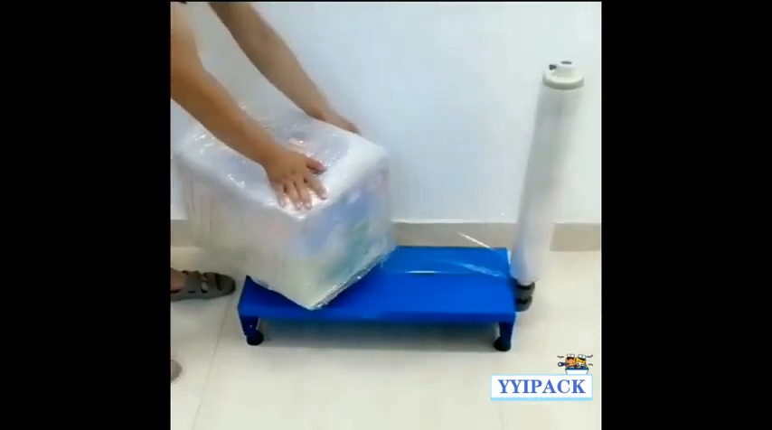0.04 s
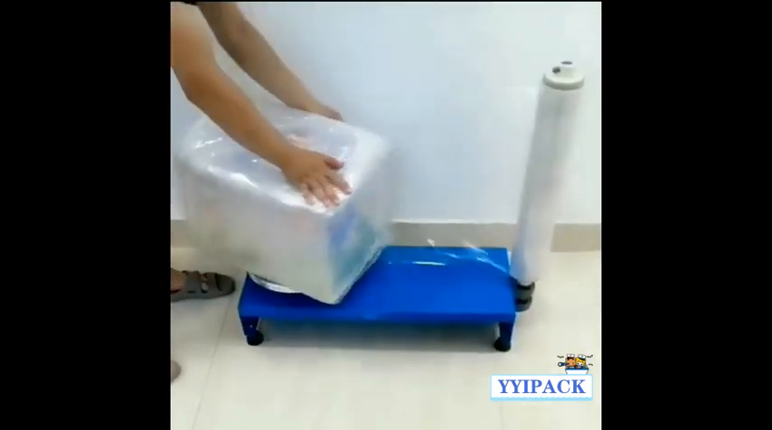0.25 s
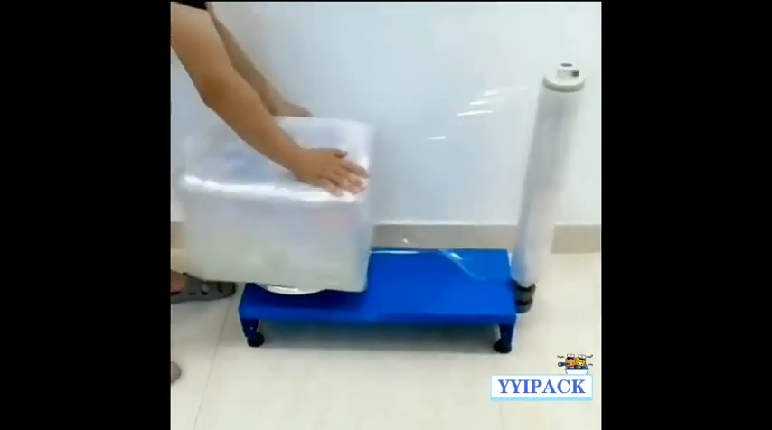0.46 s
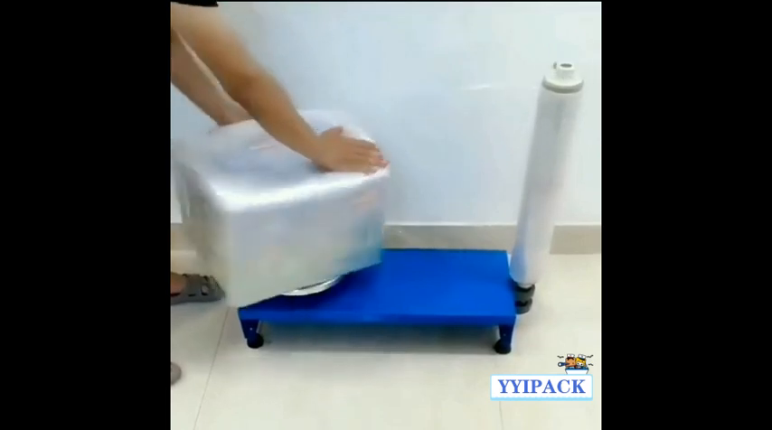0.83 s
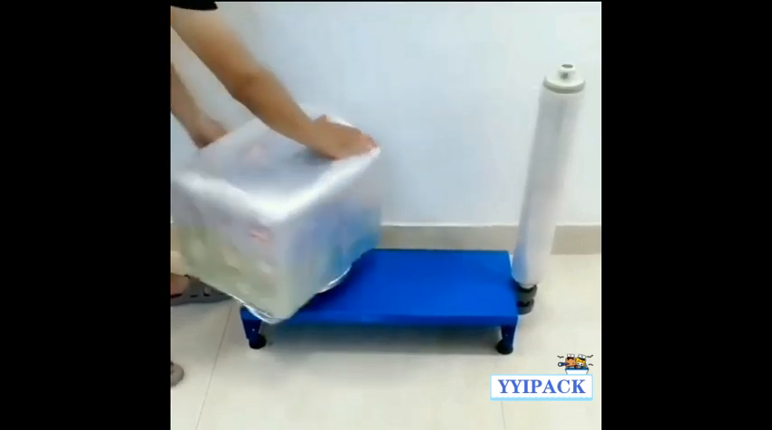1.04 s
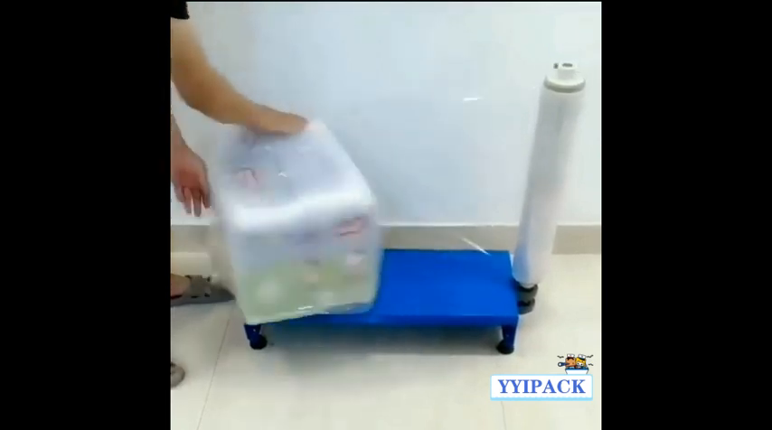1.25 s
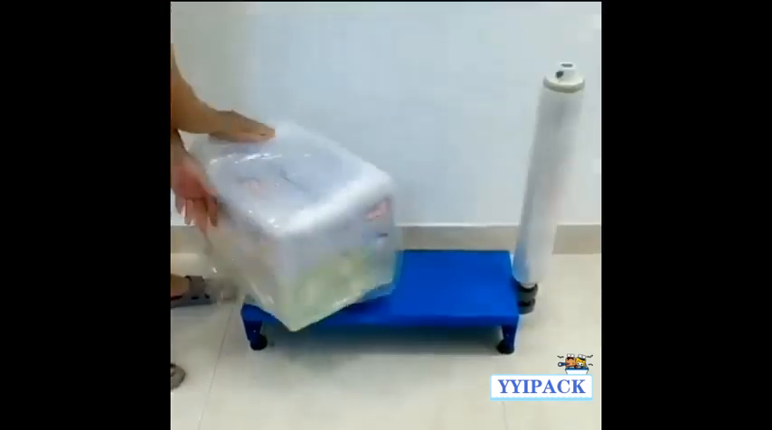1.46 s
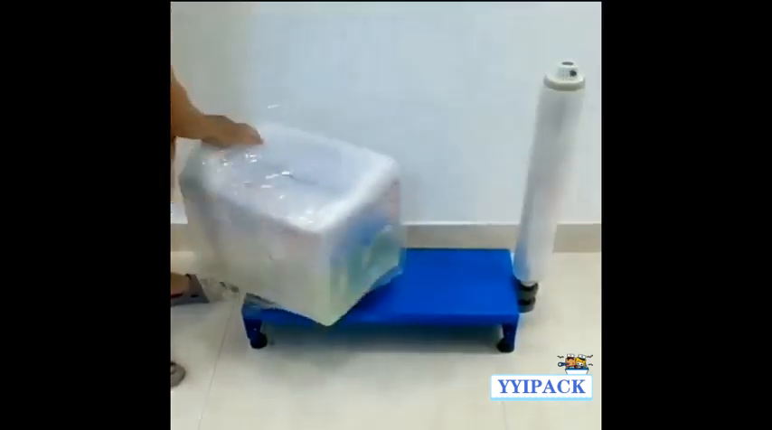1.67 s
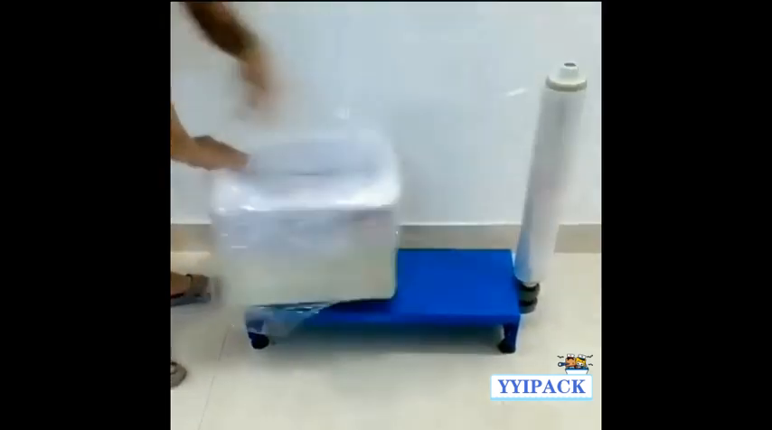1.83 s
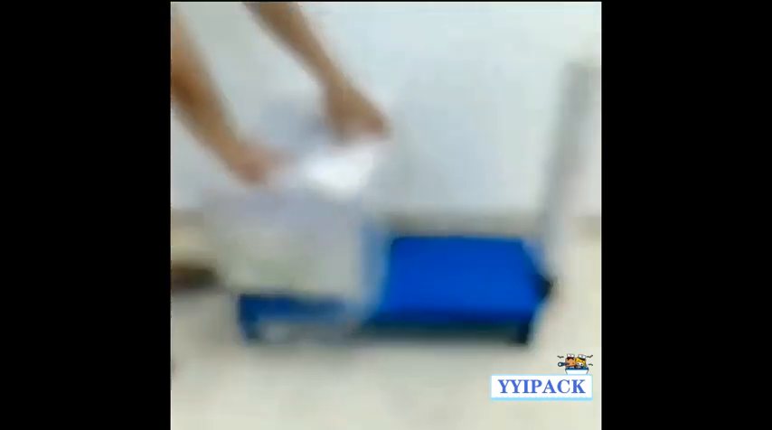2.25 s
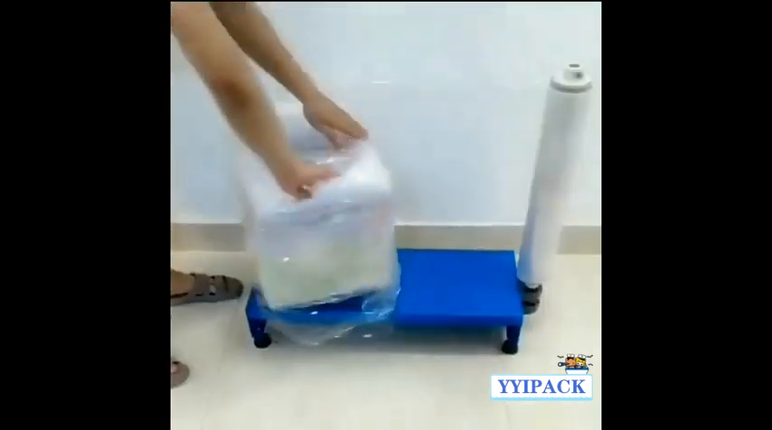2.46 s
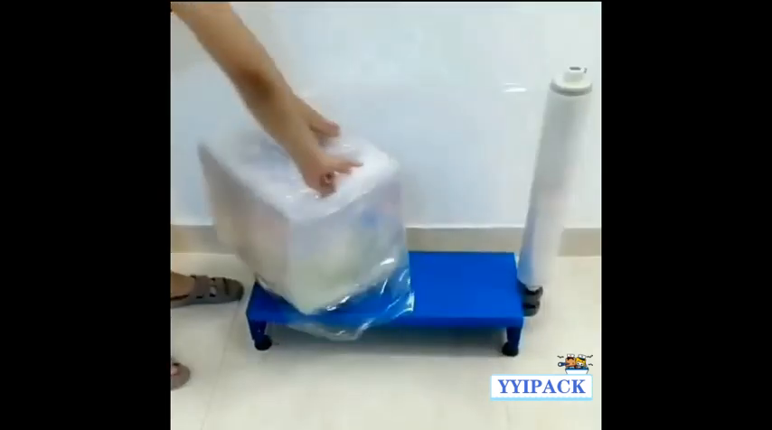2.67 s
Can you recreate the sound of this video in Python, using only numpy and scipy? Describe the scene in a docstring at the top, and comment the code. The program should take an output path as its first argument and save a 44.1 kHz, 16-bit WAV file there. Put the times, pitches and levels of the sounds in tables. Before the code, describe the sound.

Stretch wrap peels and crackles as it is pulled around a box, with faint squeaks and bumps.

```python
"""Stretch film peels off an upright roll with a fine sizzle of tiny snaps as hands turn a box on a turntable.
Dragged over the corners, the tacky film crinkles in bright bursts, drums on the box, rips free where it
sticks and squeaks where it slips; a thin tone rings briefly early on. Underneath, the box scrapes and
bumps in a small tiled room with a faint hiss.
Two closely spaced microphone ports hear it all, the left one without bass."""
import sys
import numpy as np
from scipy import signal
from scipy.fft import rfft, irfft
from scipy.io import wavfile

SR = 44100
rng = np.random.default_rng(int(sys.argv[2]) if len(sys.argv) > 2 else 0)


def dump(signal):
    """Clip the signal to [-1, 1] and save it as 16-bit WAV at the path in sys.argv[1]."""
    limited = np.clip(np.atleast_2d(signal).T, -1, 1)
    pcm = np.round(limited * 32767).astype(np.int16)
    wavfile.write(sys.argv[1], SR, pcm)


N = 123479
T = np.arange(N) / SR

# tone of each layer (frequency [Hz], relative level [dB])
AIR_EQ = [(30, -31), (45, -10), (70, -40.5), (250, -4.5), (1000, -10), (3000, -16.5), (6000, -2),
          (7000, -17.5), (8500, 1.5), (9500, 0)]
BUMP_EQ = [(70, -56.5), (125, -47), (175, -7.5), (240, -7), (400, -0.5), (600, 4), (1000, -15.5),
           (3000, -43.5), (9000, -56.5)]
SCRAPE_EQ = [(100, -45), (230, -5), (450, -5), (600, -3), (830, -9.5), (1000, -2), (1150, 1), (1260, -5.5),
             (1380, 3), (1700, -15), (1900, -11.5), (2600, -12), (8000, -39)]
TONE_AND_SQUEAK_EQ = [(200, -33.5), (330, -18), (600, 2), (950, -12), (1190, 0.5), (1330, 11), (1600, 10),
                      (1800, 3), (2300, 9), (2600, 0.5), (2950, -2), (3350, -2), (4200, -11), (5000, -29.5),
                      (9000, -27)]
RIP_EQ = [(90, -68), (200, -29), (700, -14.5), (1100, -9.5), (1800, -3.5), (2500, 2.5), (3200, 2.5),
          (3900, -14), (9000, -8)]
DRUM_EQ = [(80, -52), (140, -22.5), (230, -10), (450, 0.5), (750, -7.5), (1100, -3.5), (1400, -0.5),
           (1720, -6), (2200, 1), (2700, -14), (3300, -5), (5000, -11), (9000, -7)]
CRACKLE_EQ = [(100, -72), (250, -42.5), (800, -37.5), (2000, -34.5), (3200, -30), (4300, -28.5),
              (6000, -8.5), (6900, -5), (7400, -3), (8200, 2.5), (8700, -1.5), (9100, 1), (9500, -6)]
PEEL_EQ = [(90, -65.5), (150, -28), (240, -10.5), (500, -9), (800, -15.5), (1400, -12), (2000, -19),
           (3000, -23), (3600, -13), (4200, -3.5), (5000, 2.5), (5600, 2), (6300, -10.5), (6800, -6),
           (7300, -5), (8500, 0.5), (9500, -3)]

# knocks of the box on the turntable (time [s], level [dB])
BUMP_CUES = [(0.303, -53), (0.859, -58.5), (0.891, -69), (1.021, -56), (1.353, -60.5), (1.977, -49.5),
             (2.029, -54), (2.085, -56), (2.386, -58.5)]
# drags of the wrapped box (start [s], length [s], level [dB])
SCRAPE_CUES = [(0.29, 0.042, -51.5), (1.546, 0.031, -52), (1.608, 0.042, -49), (1.947, 0.084, -48.5),
               (2.038, 0.092, -52.5), (2.31, 0.037, -50.5)]
# first row: a brief, thin ringing tone near 4.2 kHz; the other rows: film squeaks
# (start [s], length [s], pulse rate [Hz], end rate [Hz], level [dB], period jitter [0-1], roughness [0-1])
TONE_AND_SQUEAK_CUES = [(.343, .045, 4200, 4250, -35, .03, 0), (1.209, .04, 3300, 3480, -45.5, .1, 0),
                        (1.289, .072, 331, 322, -52, .025, .5), (1.523, .052, 601, 580, -47.5, .026, .7),
                        (2.172, .03, 3400, 3250, -46, .09, 0), (2.245, .075, 3200, 3380, -47, .09, 0)]
# stuck film coming free (start [s], length [s], level [dB])
RIP_CUES = [(.3, 0.0034, -43), (0.335, .103, -53), (2.1, 0.018, -57), (2.337, .085, -49)]
# film dragged over the corners (start [s], length [s], crackle level [dB], drum level [dB])
CRINKLE_CUES = [(0.096, 0.0089, -50, -62), (0.189, 0.078, -44, -85), (0.299, 0.021, -37, -48.5),
                (0.321, 0.016, -30, -55), (0.331, 0.0096, -56, -50.5), (0.358, 0.024, -27.5, -53.5),
                (0.382, 0.012, -33.5, -55), (0.397, 0.021, -31.5, -53.5), (0.423, 0.01, -36, -69),
                (0.595, 0.049, -46, -60), (1.009, 0.018, -44, -56), (1.118, 0.038, -59, -56.5),
                (1.154, 0.029, -40, -70), (1.309, 0.055, -42.5, -54), (1.509, 0.043, -45.5, -58.5),
                (1.534, 0.066, -38.5, -70), (1.627, 0.048, -42, -56), (1.678, .05, -78, -69),
                (1.925, 0.045, -41, -54.5), (1.966, 0.008, -33.5, -45.5), (1.989, 0.0088, -38, -51),
                (2.016, 0.005, -41.5, -54), (2.04, 0.053, -35.5, -46.5), (2.065, 0.011, -33, -44.5),
                (2.087, 0.02, -40, -42), (2.1, 0.025, -31, -43.5), (2.127, 0.031, -47, -51),
                (2.171, 0.018, -34, -46.5), (2.198, 0.011, -34.5, -46.5), (2.213, 0.038, -31, -49.5),
                (2.274, 0.018, -39, -51.5), (2.293, 0.037, -30, -45), (2.335, 0.022, -28, -45.5),
                (2.358, 0.052, -35, -47.5), (2.554, 0.045, -76, -53)]
# fader ride of the peel off the roll (time [s], level [dB])
PEEL_RIDE = [(.092, -48.5), (.2, -47.5), (.3, -42), (.5, -46.5), (.65, -45.5), (.76, -52), (.87, -47.5),
             (.98, -50), (1.1, -45), (1.28, -45), (1.48, -47.5), (1.72, -45.5), (1.86, -51), (1.95, -44),
             (2.45, -41.5), (2.6, -46.5), (2.8, -47.5)]
# stereo image of the two ports (frequency [Hz], left minus right [dB], left phase lead [rad])
PORT_IMAGE = [(300, 0, -.3), (1000, 4, -.6), (1500, 4, -.8), (2600, 4, -1.15), (3200, 5, -1.25),
              (3600, 9, -1.6), (4200, 9, -2.6), (4700, 6, -2.9), (5350, 5, -3.15), (6000, 2.5, -3.75),
              (6800, 0, -3.85), (7500, -1.5, -3.95), (8700, -.5, -3.8), (9100, 1.5, -3.9), (9500, 5, -4.0)]

ATTACK_S, RELEASE_S = 0.0015, 0.0048  # default snappy envelope


def undb(db):
    """Decibels to gain."""
    return 10 ** (np.asarray(db) / 20)


def on_log_axis(hz, points, values):
    """Joins points by straight lines over log frequency."""
    return np.interp(np.log(hz + 1), np.log(points), values)


def eq(x, curve, size=2048):
    """Minimum-phase EQ of unit power, shaped by a (frequency [Hz], level [dB]) curve."""
    hz = np.arange(size // 2 + 1) * SR / size
    gain = undb(on_log_axis(hz, *np.array(curve).T))
    cepstrum = irfft(np.log(gain))
    cepstrum[1:size // 2] *= 2
    cepstrum[size // 2 + 1:] = 0
    response = irfft(np.exp(rfft(cepstrum)))
    return signal.fftconvolve(x, response / np.linalg.norm(response))[:N]


def clicks(per_s, scatter_db):
    """A grain bed of tiny random snaps of scattered size, rms 1."""
    size = undb(scatter_db * np.clip(rng.standard_normal(N), -2, 2))
    polarity = np.sign(rng.standard_normal(N))
    snaps = size * polarity * (rng.random(N) < per_s / SR)
    return snaps / np.std(snaps)


def burst(start, length, attack_s=ATTACK_S, release_s=RELEASE_S):
    """Envelope with a linear attack; an exponential release sets in after the length."""
    rise = np.clip((T - start) / attack_s, 0, 1)
    return rise * np.exp(-np.maximum(T - start - length, 0) / release_s)


def crackle_envelope():
    """Strength of the crackle over time; overlapping bursts add in power."""
    return np.sqrt(sum((undb(db) * burst(start, length)) ** 2 for start, length, db, _ in CRINKLE_CUES))


def peel_envelope(start_s=0.0897, attack_s=0.0027):
    """Strength of the peel over time, with a sharp entry."""
    level_db = np.interp(T, *np.array(PEEL_RIDE).T)
    return undb(level_db) * np.clip((T - start_s) / attack_s, 0, 1)


def air(level_db=-67):
    """A faint, steady bed of hiss."""
    return undb(level_db) * eq(rng.standard_normal(N), AIR_EQ)


def room(x, t60_s=0.54, predelay_s=0.0025, crossfades=12):
    """Diffuse reverb off hard walls and floor; crossfaded tails shift the echoes as the box turns."""
    t = T[:SR // 2]
    decay = np.exp(-np.log(1000) * t / t60_s) * (t > predelay_s)
    wet = np.zeros(N)
    for k in range(crossfades + 1):
        send = np.sqrt(np.maximum(1 - np.abs(T / T[-1] * crossfades - k), 0))
        tail = rng.standard_normal(len(t)) * decay
        wet += signal.fftconvolve(x * send, tail / np.linalg.norm(tail))[:N]
    return wet


def bumps():
    """The box knocks on the turntable, short and dull."""
    envelope = sum(undb(db) * burst(start, 0, release_s=0.018) for start, db in BUMP_CUES)
    return eq(envelope * rng.standard_normal(N), BUMP_EQ)


def scrapes():
    """The wrapped box drags and its hollow body answers with a low rasp."""
    envelope = sum(undb(db) * burst(start, length, attack_s=0.057, release_s=0.041)
                   for start, length, db in SCRAPE_CUES)
    return eq(envelope * clicks(per_s=1100, scatter_db=0.5), SCRAPE_EQ)


def pulse_train(start, length, hz, end_hz, jitter, rough, count=500, scatter_db=2.5):
    """Gliding pulses of uneven period; roughness makes them strong and weak in turn."""
    rate = np.interp(np.arange(count) / hz, [0, length], [hz, end_hz])
    periods = (1 + jitter * rng.standard_normal(count)) / rate
    position = (start + np.cumsum(periods)) * SR
    size = undb(rough * scatter_db * rng.standard_normal(count))
    size *= 1 + .3 * rough * (-1) ** np.arange(count)
    size /= size.mean()
    index, part = position.astype(int), position % 1  # each pulse straddles two samples
    pulses = np.bincount(index, size * (1 - part), N)[:N] + np.bincount(index + 1, size * part, N)[:N]
    return np.sqrt(SR / hz) * (pulses - hz / SR)


def tone_and_squeaks(spread_s=.004):
    """A brief, thin ringing tone near 4.2 kHz, then the stick-slip squeaks of the film."""
    pulses = np.zeros(N)
    for start, length, hz, end_hz, db, jitter, rough in TONE_AND_SQUEAK_CUES:
        swell = burst(start, length, attack_s=.35 * length, release_s=.02)
        pulses += undb(db) * swell * pulse_train(start, length, hz, end_hz, jitter, rough)
    chirp = signal.chirp(T[T < spread_s], f0=4830, t1=spread_s, f1=0)  # smears each pulse, treble first
    chirp /= np.abs(rfft(chirp)).max()
    return eq(signal.fftconvolve(pulses, chirp)[:N], TONE_AND_SQUEAK_EQ)


def rips():
    """Stuck film comes free all at once in a broad, dense rasp that stops abruptly."""
    envelope = sum(undb(db) * burst(start, length) for start, length, db in RIP_CUES)
    return eq(envelope * clicks(per_s=5000, scatter_db=1.5), RIP_EQ)


def creases(count=900, low_hz=1814, high_hz=4395, decay_s=.011):
    """Small taut creases ping, each at its own pitch, louder as the film works harder."""
    t = T[:SR // 20]
    pings = np.zeros(N + len(t))
    for when, pitch, accent in rng.random((count, 3)):
        hz = low_hz + pitch * (high_hz - low_hz)
        onset = int(when * N)
        pings[onset:onset + len(t)] += undb(2 * accent) * np.sin(2 * np.pi * hz * t) * np.exp(-t / decay_s)
    radiated = np.diff(pings)[:N]  # small creases radiate high pitches best
    effort = np.hypot(crackle_envelope(), undb(0.5) * peel_envelope())
    return undb(-20) * effort * radiated / np.std(radiated)


def drumming():
    """The taut sheet drums on the box, giving the crinkles body and a longer tail."""
    power = sum((undb(db) * burst(start, length, release_s=0.023)) ** 2
                for start, length, _, db in CRINKLE_CUES)
    return eq(np.sqrt(power) * clicks(per_s=1300, scatter_db=2.5), DRUM_EQ)


def crinkles():
    """Folds buckle over the corners in bright showers of cracks."""
    return eq(crackle_envelope() * clicks(per_s=3400, scatter_db=2.5), CRACKLE_EQ)


def peel():
    """Tacky film lets go of the roll in thousands of tiny snaps: a fine sizzle."""
    return eq(peel_envelope() * clicks(per_s=6000, scatter_db=1.5), PEEL_EQ)


def scene(reverb_db=-8, width_db=-11.5):
    """All sources, reverb and hiss sit in the centre; one more reverb on each side adds width."""
    direct = (peel() + crinkles() + drumming() + creases() + rips()
              + tone_and_squeaks() + scrapes() + bumps())
    centre = direct + undb(reverb_db) * room(direct) + air()
    return centre + undb(width_db) * np.array([room(direct), room(direct)])


def record(dry):
    """Two ports, apart in level and phase, ring just under a steep treble cut; the left has no bass."""
    left_cut_hz, ring_hz, ring_width_hz, top_hz = 1005, 9505, 288, 9660
    size = 2 * N
    hz = np.arange(N + 1) * SR / size
    points, balance_db, lead_rad = np.array(PORT_IMAGE).T
    half_balance = undb(on_log_axis(hz, points, balance_db) / 2)  # each side takes half the image
    half_image = half_balance * np.exp(.5j * on_log_axis(hz, points, lead_rad))
    highpass = signal.butter(6, left_cut_hz, "high", fs=SR, output="sos")
    bass_cut = np.abs(signal.sosfreqz(highpass, hz, fs=SR)[1])
    ports = np.array([half_image * bass_cut, 1 / half_image])
    ring = 1 + undb(5.5) / (1 + 2j * (hz - ring_hz) / ring_width_hz)
    treble_cut = np.clip((top_hz - hz) / 100 + .5, 0, 1)
    return irfft(rfft(dry, size) * ports * ring * treble_cut, size)[:, :N]


dry = scene()
out = record(dry)
dump(out)
```